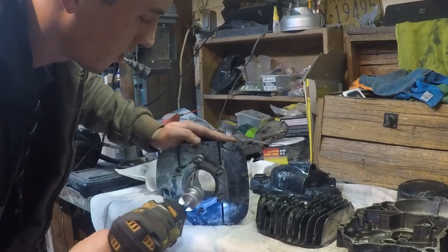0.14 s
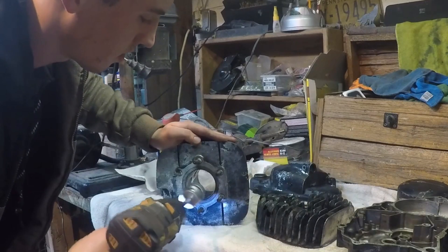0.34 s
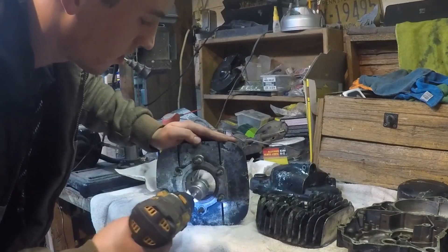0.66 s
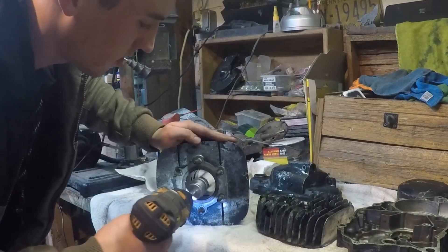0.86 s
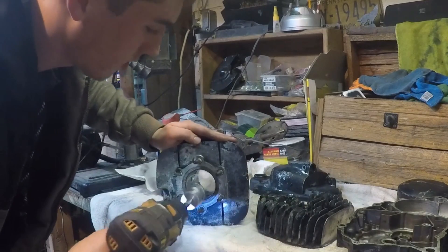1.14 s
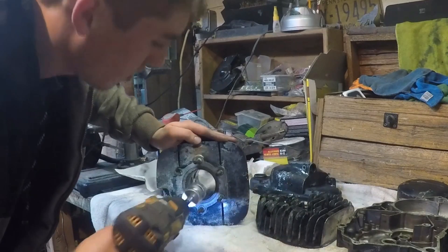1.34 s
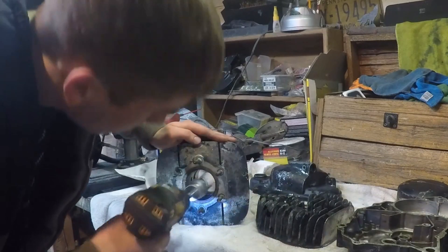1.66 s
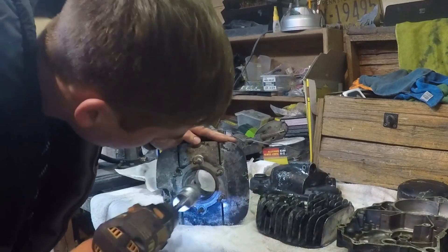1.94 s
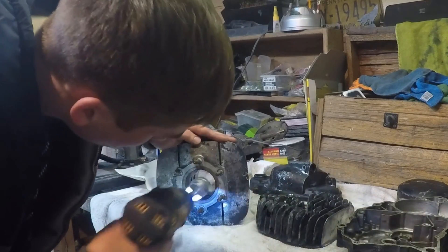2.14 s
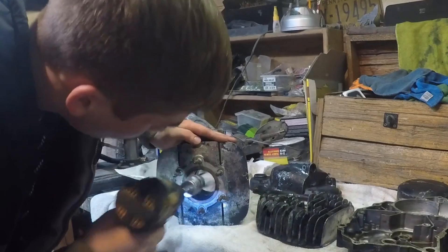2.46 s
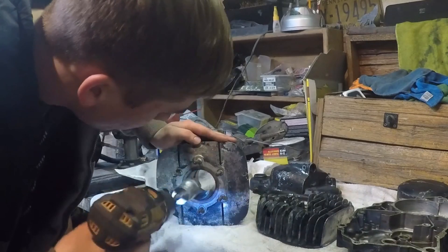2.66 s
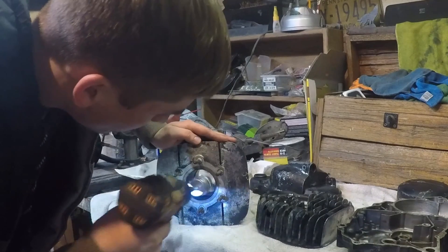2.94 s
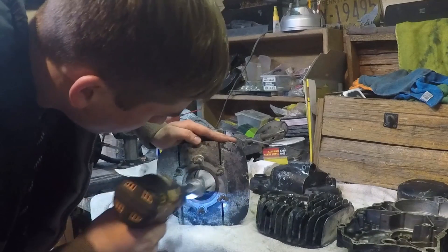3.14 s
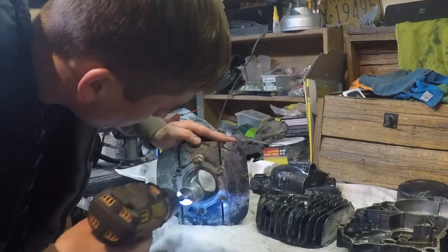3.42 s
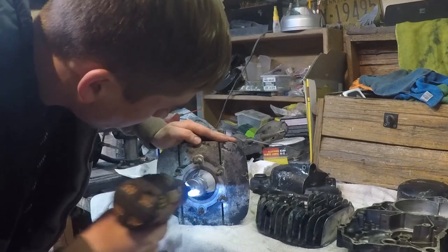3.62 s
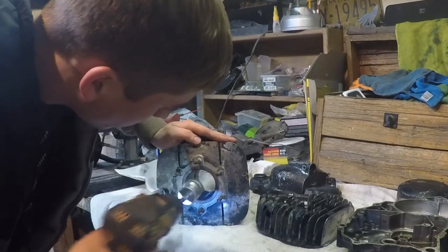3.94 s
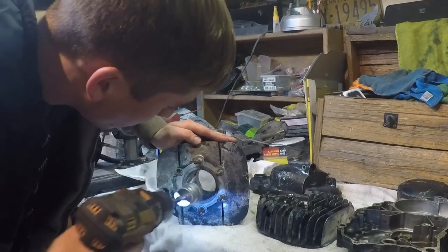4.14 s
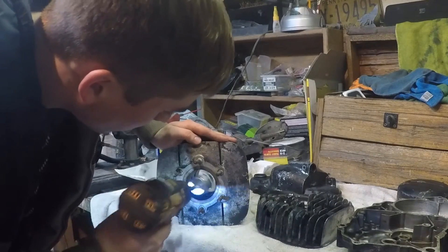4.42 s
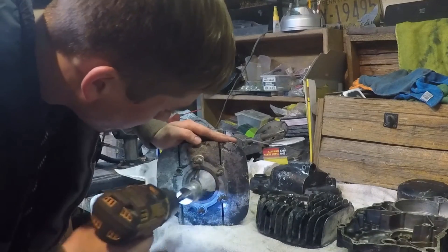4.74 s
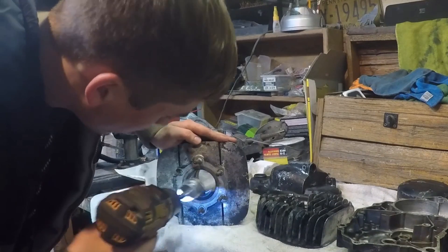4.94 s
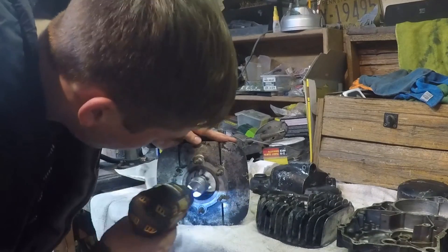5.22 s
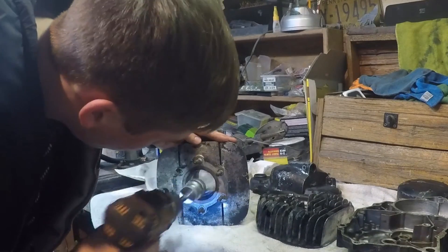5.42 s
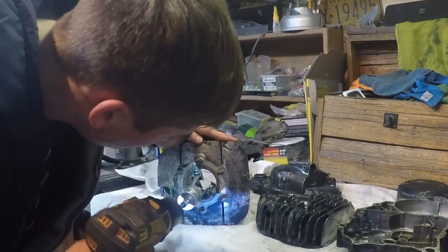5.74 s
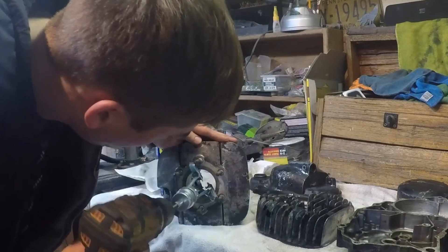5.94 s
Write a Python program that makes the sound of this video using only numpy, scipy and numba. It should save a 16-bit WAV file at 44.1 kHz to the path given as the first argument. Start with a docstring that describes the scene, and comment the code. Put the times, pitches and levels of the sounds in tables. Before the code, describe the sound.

Close cordless drill whirring at wavering speed, with gritty scraping of stones on metal, brief clatters and a final ringing snap.

```python
"""Honing a cylinder with a cordless drill

A drill spins a hone (grinding stones on springy arms) in a small engine cylinder on a wooden bench.
Its gears whine and rattle, its speed control whistles and its fan hisses. The stones scrape the
cylinder wall, rasp on the way back, and now and then catch and shake the cylinder on the bench.
At last the hone pops out and rings, and the drill stops."""
import sys
import numpy as np
from scipy import signal
from scipy.fft import rfft, irfft
from scipy.io import wavfile
from scipy.ndimage import uniform_filter1d
from numba import njit

SR = 44100
rng = np.random.default_rng(int(sys.argv[2]) if len(sys.argv) > 2 else 0)


def log_audio(samples):
    """Write samples as a 16-bit WAV file to the path given in sys.argv[1]."""
    # one column per channel
    frames = np.atleast_2d(samples).T
    # limit to full scale, then quantise
    limited = np.clip(frames, -1, 1)
    pcm = np.round(limited * 32767).astype(np.int16)
    wavfile.write(sys.argv[1], SR, pcm)


N = 268156
T = np.arange(N) / SR
TEETH_PER_TURN = 45  # gear teeth that meet in one turn of the hone
POP_S, POP_T60_S = 5.7, 0.053  # the hone leaves the cylinder; t60 is the time to fade by 60 dB
STOP_S = 5.905  # the trigger is let go


def drill(tooth_hz, teeth, turns, brake_db=3.5, coast_db=-25, unloaded_db=-10):
    """Rattling gears ring the gearbox and outer shell, with whine and whistle on top."""
    # ringing notes of the gearbox and of the shell: pitch_hz, width_hz, level_db
    gearbox_notes = [(579, 56, -6.5), (683, 32, -2), (846.3, 45.4, 3), (1050.3, 18, 4.5), (1146, 120, -5.5),
                     (1520, 340, -7), (1755, 69, 0), (1996, 186, -6)]
    shell_notes = [(2490, 220, 3), (2760, 180, 3.5), (3136, 205, 2), (3470, 310, -2.5), (4190, 400, -3)]
    chatter = gear_rattle(teeth)
    # the small housing gives off little bass
    gearbox = resonate(chatter, gearbox_notes)
    gearbox = unit(colour(gearbox, [(200, -17), (450, -1), (560, 2), (2200, 0), (5000, -3)]))
    gearbox *= effort(tooth_hz, steady_db=-29, stroke_db=-3, return_db=1, octave_db=1.5)
    gearbox *= undb(brake_db * swell(5.88, 0.052))  # the gears clatter as the motor brakes
    shell = resonate(chatter, shell_notes)
    shell = unit(colour(shell, [(1500, 5), (2400, 6), (4500, 7), (9000, -9)]))
    shell *= effort(tooth_hz, steady_db=-29.5, stroke_db=-5.5, return_db=3, octave_db=-1)
    free = 1 - until(POP_S, POP_T60_S)
    tones = gear_whine(tooth_hz, teeth, turns) * undb(unloaded_db * free) + motor_whistle(teeth, free)
    running = until(STOP_S, t60=0.13)
    return (gearbox + shell) * np.maximum(running, undb(coast_db)) + tones * running


def gear_rattle(teeth, repeat_share=0.49, pulse_depth=0.82, steps_per_tooth=32):
    """Teeth chatter as they meet, so the noise glides with speed; part of it repeats every turn."""
    # the rattle's tone: multiple_of_tooth_rate, level_db
    rattle_tone = [(.3, -6), (.42, 4), (.52, 15.5), (.62, 2.5), (.7, 6), (.84, 8.5), (1, 9), (1.2, 3.5),
                   (1.8, 7), (2.08, 10.5), (2.45, 5), (2.95, 5.5), (3.4, -2.5), (4, 3), (8, -2)]
    count = int(teeth[-1] + 2) * steps_per_tooth
    repeating = np.resize(rng.standard_normal(TEETH_PER_TURN * steps_per_tooth), count)
    chatter = np.sqrt(repeat_share) * repeating + np.sqrt(1 - repeat_share) * rng.standard_normal(count)
    chatter = colour(chatter, [(multiple * SR / steps_per_tooth, db) for multiple, db in rattle_tone])
    pulses = 1 + pulse_depth * np.cos(2 * np.pi * teeth)
    return np.interp(teeth * steps_per_tooth, np.arange(count), chatter) * pulses


def gear_whine(tooth_hz, teeth, turns, flutter_db=.55, roughness=.16):
    """Meeting teeth sing; off-centre gears make odd and even harmonics throb by turns."""
    # the gears' harmonics: multiple_of_tooth_rate, level_db, throb_depth, throb_offset_turns
    harmonics = [(1, 4, .95, .18), (2, .7, .6, .65), (3, -2.7, .9, .1), (4, -4.5, .8, .55)]
    # swells of the upper harmonics: time_s, second_db, third_db, fourth_db
    swells = [(.3, 2, 3, 8), (.65, -1, -4, 7), (.9, 2.5, -3, 1), (1.15, -1, -2, -5), (1.36, 5.5, -2, -2),
              (1.55, -2, 0, -2), (1.89, 3, 2, -4), (2.05, -3, 4, 0), (2.3, 2, -1, 0), (2.5, 3, -3, -1),
              (2.75, -1, 1, -1), (2.92, -8, -2, -1), (3.1, 3, 4, -1), (3.24, 4, 9, 0), (3.38, -5, -5, -4),
              (3.5, 3, 3, 10.5), (3.57, -2, 8, -2), (3.74, -8, 5.5, -4), (3.95, -8, 0, -2),
              (5.5, -3, 0, -3), (5.8, 7, 2, 4)]
    # how well the housing carries each pitch: pitch_hz, level_db
    housing = [(700, -46), (820, -34), (880, -30.5), (950, -44.5), (1030, -35.5), (1200, -41),
               (1480, -34.5), (1730, -34.5), (2000, -30), (2300, -40.5), (2560, -35), (2850, -33),
               (3050, -38), (3300, -34.5), (3700, -35), (4400, -39)]
    cycles = teeth + .026 * wander(200) + .04 * wander(30)
    labour = np.interp(tooth_hz, [870, 1020], [1, .45])  # a slower drill throbs more deeply
    out = 0
    for (multiple, db, depth, offset), swell_db in zip(harmonics, [0] + curves(swells)):
        throb = 1 + labour * depth * np.cos(2 * np.pi * (turns + offset))
        angle = 2 * np.pi * multiple * cycles
        # slack between the teeth roughens the upper harmonics most
        tone = throb * np.sin(angle) + multiple * roughness * wander(120) * np.cos(angle)
        housing_db, = curves(housing, at=multiple * tooth_hz)
        out += undb(housing_db + db + swell_db + multiple * flutter_db * wander(90)) * tone
    return out


def motor_whistle(teeth, free, switch_hz=4051, teeth_per_motor_turn=2.243, waver_db=2):
    """Switched current makes the coils whistle, with side tones one and two motor spin rates away."""
    # the tones change with the trigger: time_s, whistle_db, first_side_db, second_side_db
    levels = [(.4, -34, -55, -55), (.8, -30.5, -36, -45), (1, -33, -41, -45), (1.2, -36, -31, -40),
              (1.45, -32.5, -35.5, -45), (1.7, -31.5, -46, -42), (2, -34, -34, -32),
              (2.48, -34.5, -48, -43), (2.65, -37, -50, -26.5), (2.72, -33, -50, -32),
              (2.84, -33, -47, -29), (2.93, -37, -41, -41), (3.25, -35, -52, -60), (3.45, -29, -42, -33),
              (3.7, -40, -40, -46), (4.2, -29, -35, -58), (4.6, -35.5, -40, -55), (5.55, -34, -37, -52),
              (5.84, -36, -39, -33), (5.92, -55, -56.5, -54)]
    whistle_db, *sides_db = curves(levels)
    switch = 2 * np.pi * switch_hz * T
    motor = 2 * np.pi * teeth / teeth_per_motor_turn
    out = undb(whistle_db + 1 + waver_db * wander(24.57)) * np.sin(switch)
    octave_db = np.minimum(whistle_db, -42 + 6 * free)
    out += undb(octave_db + waver_db * wander(27)) * np.sin(2 * switch)
    for k, db in enumerate(sides_db, 1):
        pair = undb(1) * np.sin(switch + k * motor) + undb(-7) * np.sin(switch - k * motor)
        out += undb(db + waver_db * wander(25.36)) * pair
    return out * undb(3 * wander(110) - 1.5)  # a fast random flutter roughens the whistle


def stones(tooth_hz, turns, grit_db=4, patchy_db=0.84, exit_s=0.63, exit_db=-3.5):
    """Sharp grains tear at the wall; the harder the stones bite, the more the cylinder sings."""
    # tone of plain rubbing and of hard biting: pitch_hz, level_db
    rub_tone = [(150, -14), (400, -10.5), (700, -4.5), (1500, -5), (3000, -4), (4400, 2.5), (5300, -4.5),
                (6300, -10.5), (7100, -0.5), (8600, 4), (9500, -3.5), (10700, -6.5), (12000, 1),
                (13300, -5), (15500, -16.5)]
    bite_tone = [(2500, -27), (4500, -8.5), (5300, -3.5), (6300, -3.5), (7300, 0.5), (8600, -20.5),
                 (10000, -25), (15500, -37)]
    # how hard the stones bite: time_s, level_db
    bite_levels = [(0, -31.5), (.3, -29.5), (.6, -26), (.72, -28), (.85, -27), (.98, -27.5), (1.12, -26.5),
                   (1.28, -31), (1.48, -25.5), (1.64, -25.5), (1.75, -25), (1.86, -30), (2.04, -34),
                   (2.19, -24), (2.5, -27), (2.75, -31), (2.9, -27), (3.12, -25), (3.3, -25.5),
                   (3.48, -33.5), (3.62, -25), (3.85, -25.5), (4.15, -29.5), (4.35, -26), (4.5, -28.5),
                   (4.8, -28.5), (5.2, -26), (5.45, -26.5), (5.68, -28)]
    bite_db, = curves(bite_levels)
    grains = [rng.standard_normal(N) * undb(grit_db * np.minimum(wander(3500), 3)) for _ in range(2)]
    rub = unit(colour(grains[0], rub_tone)) * undb(0.13 * (bite_db - np.mean(bite_db)))
    rub *= effort(tooth_hz, steady_db=-23.5, stroke_db=-0.6, return_db=-0.5, octave_db=1.6)
    bite = unit(colour(grains[1], bite_tone)) * undb(bite_db)
    # the stones scrape less as they slide out
    slid_out = np.clip(1 + (T - POP_S) / exit_s, 0, 1)
    contact = until(POP_S, POP_T60_S) * undb(exit_db * slid_out)
    return cylinder((rub + bite) * contact, turns, t60=0.15) * undb(patchy_db * wander(140))


def cylinder(x, turns, t60):
    """The finned cylinder has many close notes; the turning stones ring them from changing places."""
    near, far = (echoes(x, 0, t60, samples=SR // 10) for _ in range(2))
    return (x + near * np.cos(2 * np.pi * turns) + far * np.sin(2 * np.pi * turns)) / np.sqrt(2)


def catches(turns, thud_lag_s=0.00416):
    """A caught stone grinds harshly for a moment and jolts the cylinder against the bench."""
    # the hardest catches: start_s, clash_db, thud_db, t60_s
    hard_catches = [(.813, -10, -46, 0.037), (.834, -16, -42, 0.05), (.8725, -20, -38, 0.03),
                    (.8918, -3, -29.5, 0.029), (.9015, -4.5, -39, 0.029), (1.578, -17, -41, 0.02),
                    (1.6048, -13, -34, 0.054), (1.626, -13, -35, 0.056), (1.6446, -6, -31.5, 0.028),
                    (1.664, -10, -39, .045), (2.3125, -12, -35, 0.034), (2.321, -13, -33, 0.058),
                    (2.338, -5.5, -31, 0.058), (2.365, -11, -40, .03), (2.374, -9, -31.5, 0.045),
                    (2.4051, -12.5, -40, 0.12), (2.4365, -10.5, -32.5, 0.021), (3.0989, -18, -56, 0.025),
                    (3.7485, -13, -45, 0.061), (4.4695, -6, -48, 0.026), (4.48, -10, -34, 0.039),
                    (4.5098, -2.5, -30.5, 0.032), (4.527, -4.5, -23, .04), (4.56, -13, -38, 0.1),
                    (4.589, -9.5, -39, 0.058), (5.1771, -9.5, -52, 0.032), (5.2164, -11, -37, 0.08),
                    (5.2343, -9, -30, 0.054), (5.263, -8, -32, 0.026), (5.2801, -7, -27, 0.039),
                    (5.3085, -8, -29, 0.061), (5.3455, -11, -42, .02), (5.672, -12.5, -30, 0.099),
                    (5.697, -11, -26, 0.063)]
    # tone of the grinding: pitch_hz, level_db
    clash_tone = [(200, -24), (450, -8), (700, 1), (1000, 0.5), (1800, 4.5), (3200, -1), (4300, -2),
                  (5300, 3), (6300, 6), (8400, 9.5), (10000, -10), (12000, -30), (15500, -28)]
    # the cylinder rocking on the bench: pitch_hz, level_db, t60_s
    bench_notes = [(95, 0, 0.18), (145, 5, 0.21), (184.2, 5.5, 0.16), (210, -5, 0.12), (307, -3, 0.086)]
    rows = list(hard_catches) + light_catches(turns)
    times, _, thud_db, _ = np.transpose(rows)
    force = np.sqrt(sum((undb(db) * fade(start, t60)) ** 2 for start, db, _, t60 in rows))
    clash = cylinder(force * noise(clash_tone), turns, t60=0.023)
    thud = strike(times + thud_lag_s, thud_db, bench_notes)
    # the bench gives off little deep bass, and a cloth on it softens the blow
    thud = signal.sosfilt(signal.butter(2, [90, 360], "band", fs=SR, output="sos"), thud)
    return undb(-2) * clash + undb(-1) * thud


def light_catches(turns, stone_count=3, clash_db=-16.5, thud_db=-43, scatter_db=3.5, t60=0.033):
    """Near the end of a stroke, each passing stone snags with a random strength."""
    passes = np.flatnonzero(np.diff(np.floor(stone_count * turns)))
    loads = load(lag_s=-0.068, ramp_s=0.14)[passes]
    chance_db = scatter_db * rng.standard_normal(len(passes))
    return [(start, clash_db + db + 10 * np.log10(share), thud_db + db + 20 * np.log10(share), t60)
            for start, share, db in zip(T[passes], loads, chance_db) if share > 0 and start < POP_S]


def rasps(turns, slips_per_turn=6, decay_share=0.15, swing=0.34):
    """Drawn back, the arms stick and slip, harder twice a turn, ringing themselves and the cylinder."""
    # spells of rasping: peak_s, ramp_s, squeal_db, upper_rasp_db, cylinder_db
    spells = [(4.16, 0.36, -32, -36, -32), (4.9, 0.2, -27.5, -35, -44), (5.56, 0.15, -37, -31, -42)]
    # the notes they ring: pitch_hz, width_hz, level_db
    squeal = [(2546, 63, 0.5), (2736, 55, 1)]
    upper_rasp = [(3480, 250, 0)]
    cylinder_ring = [(4165, 78, 0)]
    pressure = 1 + swing * np.cos(4 * np.pi * turns)
    slips = np.exp(-(slips_per_turn * turns % 1) / decay_share) * pressure
    out = 0
    for k, notes in enumerate((squeal, upper_rasp, cylinder_ring)):
        force = slips * rng.standard_normal(N)
        tone = 0
        for hz, width, db in notes:
            band = [(hz, 2 * width, 0)]
            tone += undb(db) * resonate(resonate(force, band), band)  # twice: quiet between the notes
        level = sum(undb(dbs[k]) * np.sqrt(swell(peak, ramp)) for peak, ramp, *dbs in spells)
        out += unit(tone) * level
    return out


def chirps(attack_s=0.0032, t60=0.015):
    """A springy arm of the hone pings on one nearly pure note that builds, holds and dies away."""
    # the arms' pings: start_s, pitch_hz, level_db, length_s
    squeaks = [(0.53, 4370, -13.5, 0.014), (0.89, 4400, -15, 0.015), (2.309, 4140, -15.5, 0.013),
               (2.338, 5120, -17, .014), (2.374, 5230, -19, .014), (2.552, 4530, -21, 0.013),
               (3.235, 4690, -20, .016), (3.595, 4420, -16.5, 0.012), (3.724, 4500, -19, .013),
               (4.478, 4316, -15, 0.011), (4.563, 4260, -18, .013), (5.088, 4200, -20, .013),
               (5.305, 5650, -18, .014)]
    drift = .04 * wander(300)
    out = 0
    for start, hz, db, length in squeaks:
        shape = np.clip((T - start) / attack_s, 0, 1) * until(start + length - attack_s, t60)
        out += undb(db) * shape * np.sin(2 * np.pi * (hz * T + drift))
    return out


def arm_snaps(clack_t60=0.037):
    """The freed arms spring open, clack against their stops and ring."""
    # the arms' blows: start_s, clack_db, ring_db
    blows = [(5.6656, -9, -41), (5.693, -15, -15.5), (5.772, -34, -29), (5.819, -26, -26.5),
             (5.977, -31, -48), (5.994, -36, -49), (6.039, -39, -59)]
    # notes of the steel arms: pitch_hz, level_db, t60_s
    arm_notes = [(1570, -2, 0.072), (2790, 1.5, 0.099), (2834, 3, 0.16), (2990, -2, 0.14),
                 (4070, -17, 0.04)]
    times, _, ring_db = np.transpose(blows)
    clack = noise([(300, -34), (650, -14), (1000, -3), (1650, 7),
                   (2600, -7), (4200, -1.5), (7000, -7), (12000, -20)])
    clack *= sum(undb(db) * fade(start, clack_t60) for start, db, _ in blows)
    return clack + strike(times, ring_db, arm_notes)


def fan(tooth_hz):
    """The motor's fan hisses louder with speed and dies when the trigger is let go."""
    # tone of the air in the vents: pitch_hz, level_db
    vent_tone = [(300, -21), (900, -1.5), (2000, 4), (4500, -1.5), (6200, -5), (7400, 0.5), (8250, 7),
                 (9200, -0.5), (10000, -3.5), (12000, -9), (15500, -24)]
    return noise(vent_tone) * undb(-30) * until(STOP_S, t60=.06) * (tooth_hz / 1000) ** 1.43


def workshop(sound):
    """The cluttered shop adds steady noise and scatters a little sound sideways: (middle, side)."""
    # background noise shared by both ears, and differing between them: pitch_hz, level_db
    shared_tone = [(25, -7.5), (60, -15), (160, -7.5), (280, -7), (450, -7), (700, -9.5), (1500, -18.5),
                   (4000, -22), (8000, -17.5), (15000, -41)]
    side_tone = [(30, -18), (120, -3), (280, 1), (700, 3), (2000, -16), (8000, -10), (15000, -30)]
    # tone of the sideways echoes: pitch_hz, level_db
    echo_tone = [(30, -35), (80, -28), (260, -18), (700, -24.5), (2000, -28.5), (5000, -24), (8000, -23.5),
                 (12000, -17)]
    middle = sound + noise(shared_tone) * undb(-42.5)
    scattered = colour(echoes(middle, delay_s=0.0011, t60=0.067, samples=SR // 4), echo_tone)
    return middle, undb(2) * scattered + noise(side_tone) * undb(-55.5)


def load(lag_s, ramp_s):
    """Drag that rises and falls as the stones bind at the end of each stroke."""
    # the stroke ends: time_s, share_of_full_load
    strokes = [(.92, 0.63), (1.68, 0.7), (2.44, 1), (3.15, .4), (3.8, 0.36), (4.6, .9), (5.34, 0.84),
               (5.77, 0.48)]
    return sum(share * swell(time + lag_s, ramp_s) for time, share in strokes)


def effort(tooth_hz, steady_db, stroke_db, return_db, octave_db):
    """Loudness of a layer that follows the hand's strokes and the drill's speed."""
    easing = load(lag_s=0.018, ramp_s=0.24)  # the hand eases off
    returning = load(lag_s=0.29, ramp_s=0.083)  # drawn back, the hone runs loose
    octaves = np.log2(tooth_hz / np.median(tooth_hz))
    return undb(steady_db + stroke_db * easing + return_db * returning + octave_db * octaves)


def undb(db):
    """Turn decibels into a multiplier."""
    return 10 ** (np.asarray(db) / 20)


def unit(x):
    """Scale to an average power of 1."""
    return x / np.sqrt(np.mean(x ** 2))


def curves(table, at=T):
    """Join each column's points with lines, along the first column (usually time)."""
    first, *columns = np.transpose(table)
    return [np.interp(at, first, column) for column in columns]


def colour(x, points):
    """Shape a sound's tone with (pitch_hz, level_db) points."""
    hz, db = np.transpose(points)
    all_hz = np.maximum(np.arange(len(x) // 2 + 1) * SR / len(x), 1)
    return irfft(rfft(x) * undb(np.interp(np.log(all_hz), np.log(hz), db)), len(x))


def noise(points):
    """Steady noise shaped by (pitch_hz, level_db) points."""
    return unit(colour(rng.standard_normal(N), points))


def resonate(x, notes):
    """Ring (pitch_hz, width_hz, level_db) notes with a sound, flipping every second one."""
    return sum((-1) ** k * undb(db) * signal.lfilter(*signal.iirpeak(hz, hz / width, SR), x)
               for k, (hz, width, db) in enumerate(notes))


def strike(times, levels_db, notes):
    """Sharp blows ring (pitch_hz, level_db, t60_s) notes."""
    blows = np.bincount((times * SR).astype(int), undb(levels_db), N)
    t = T[:SR // 2]
    tone = sum(undb(db - 60 * t / t60) * np.sin(2 * np.pi * hz * t) for hz, db, t60 in notes)
    return signal.fftconvolve(blows, tone)[:N]


def echoes(x, delay_s, t60, samples):
    """Smear a sound into a dense, dying tail."""
    tail = (rng.standard_normal(N) * fade(delay_s, t60))[:samples]
    return signal.fftconvolve(x, tail / np.linalg.norm(tail))[:N]


def wander(rate_hz):
    """A smooth random wobble of typical size 1."""
    step = int(SR / rate_hz)
    stairs = np.repeat(rng.standard_normal(N // step + 1), step)
    return unit(uniform_filter1d(stairs, step)[:N])


def fade(start, t60):
    """Jump to 1 at start, then die away."""
    age = T - start
    return (age >= 0) * undb(-60 * np.clip(age / t60, 0, 2))


def until(end, t60):
    """Hold 1 up to end, then die away."""
    return (T < end) + fade(end, t60)


def swell(peak_s, ramp_s):
    """Rise to 1 and fall again, taking ramp_s each way."""
    return np.clip(1 - np.abs(T - peak_s) / ramp_s, 0, 1)


@njit
def follow(x, attack, release):
    """Track a level, rising fast and sinking slowly."""
    out, level = np.empty(len(x)), 0.
    for i in range(len(x)):
        level += (x[i] - level) * (attack if x[i] > level else release)
        out[i] = level
    return out


def scene(full_load_slowdown=.12):
    """Drill and hone work straight ahead, slowing each time the stones bind."""
    # speed set by the trigger, before the stones drag it down: time_s, tooth_rate_hz
    trigger_speed = [(.12, 1138), (.22, 1452), (.36, 1494), (.55, 1165), (.72, 1037), (1.36, 1003),
                     (1.52, 1027), (1.88, 1020), (2.03, 943.4), (2.35, 976), (2.63, 922.4), (2.72, 846.8),
                     (3, 858), (3.06, 1018), (3.14, 1310), (3.22, 1411), (3.35, 1050), (3.5, 780.6),
                     (3.6, 1037), (3.67, 1142), (3.78, 1254), (4.35, 1181), (4.84, 1271), (5.66, 1137),
                     (5.87, 892), (5.95, 593)]
    trigger_hz, = curves(trigger_speed)
    tooth_hz = trigger_hz * (1 - full_load_slowdown * load(lag_s=0, ramp_s=.17))
    teeth = np.cumsum(tooth_hz) / SR  # gear teeth that have met so far
    turns = teeth / TEETH_PER_TURN
    tool = drill(tooth_hz, teeth, turns) + fan(tooth_hz)
    hone = stones(tooth_hz, turns) + rasps(turns) + catches(turns) + chirps() + arm_snaps()
    middle, side = workshop(tool + hone)
    return np.array([undb(0.93) * (middle + side), undb(1.2) * (middle - side)])


def record(dry, limit_db=-18.5, cut_share=0.7, attack_s=0.068, release_s=0.15, top_hz=15600):
    """Automatic volume control dips after loud catches; peaks are rounded and the top treble is cut."""
    power = uniform_filter1d(np.mean(dry ** 2, axis=0), size=256)
    heard = follow(power, 1 / (attack_s * SR), 1 / (release_s * SR))
    gain = np.maximum(heard / undb(limit_db) ** 2, 1) ** (-cut_share / 2)
    return signal.sosfilt(signal.ellip(10, .2, 80, top_hz, fs=SR, output="sos"), np.tanh(dry * gain))


dry = scene()
out = record(dry)
log_audio(out)
```